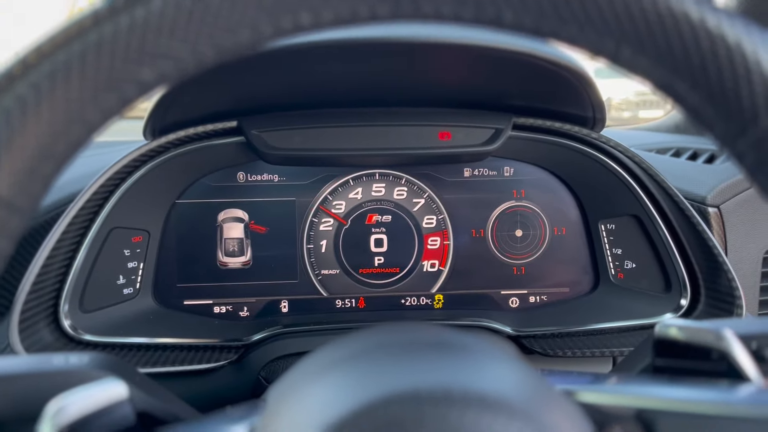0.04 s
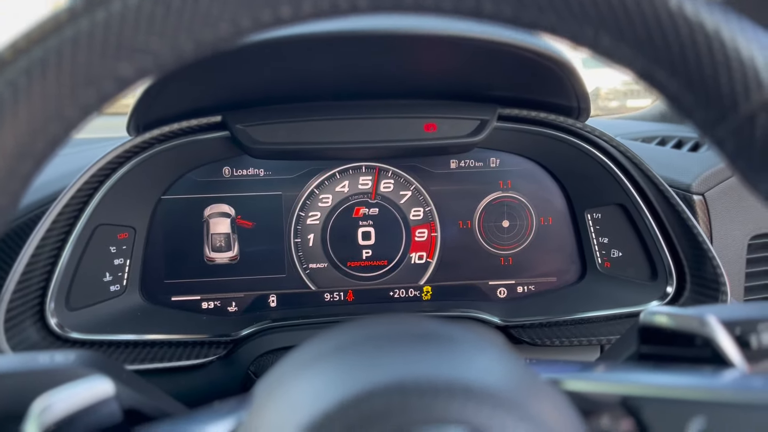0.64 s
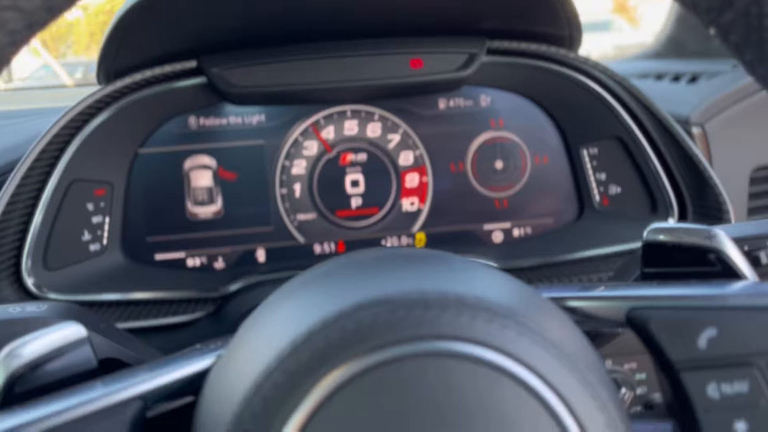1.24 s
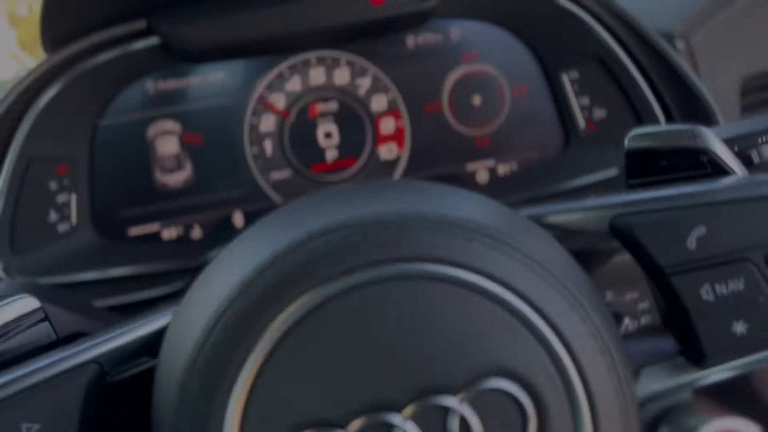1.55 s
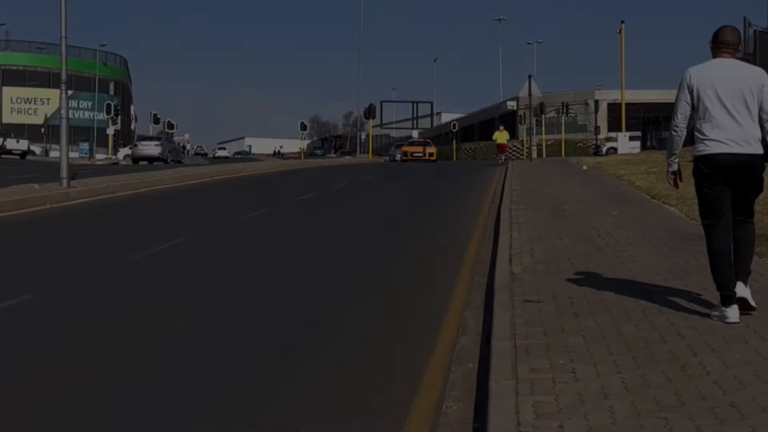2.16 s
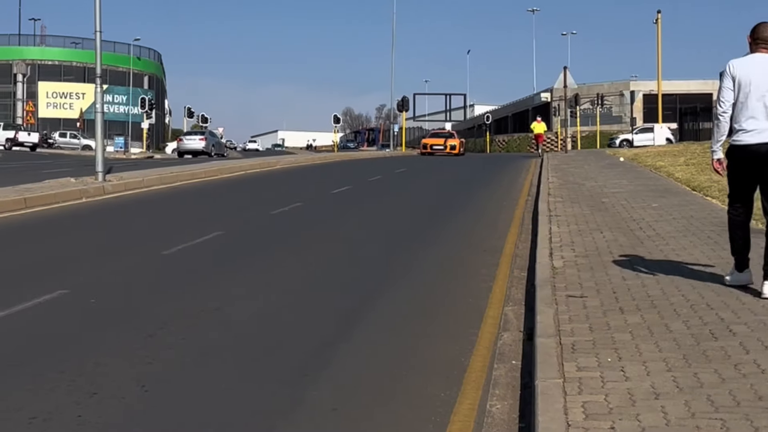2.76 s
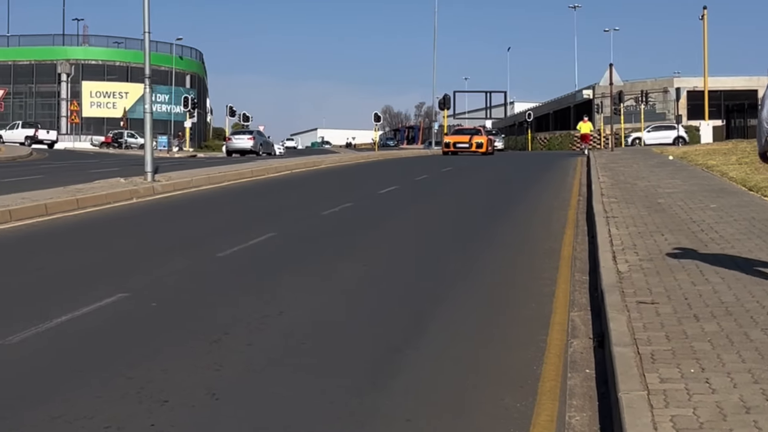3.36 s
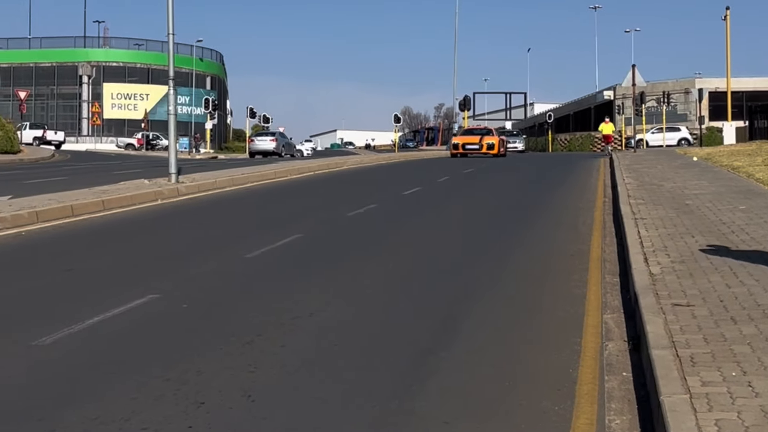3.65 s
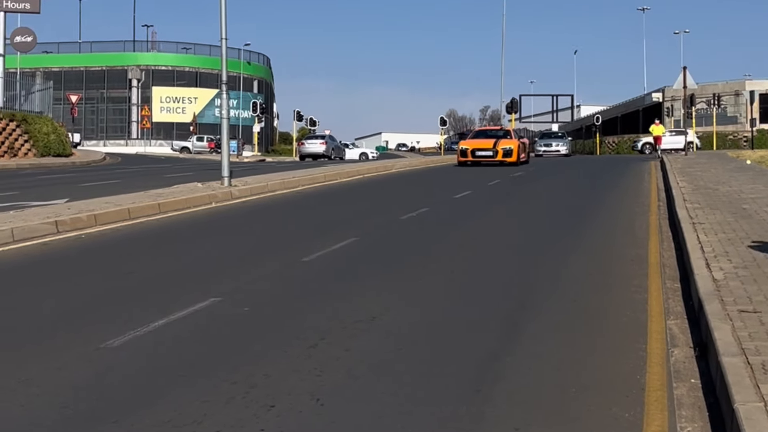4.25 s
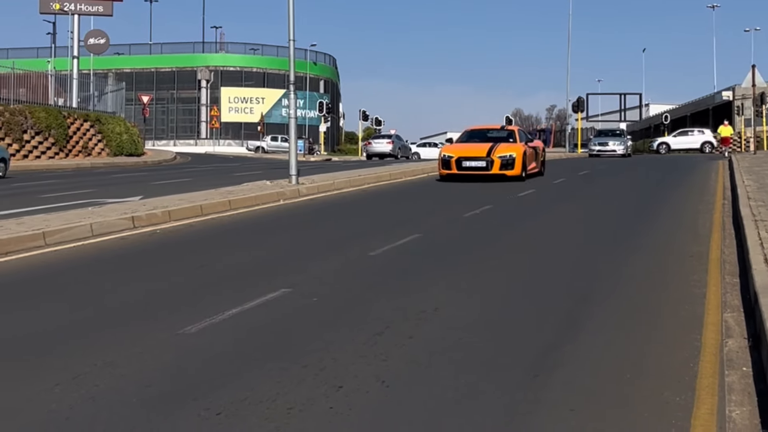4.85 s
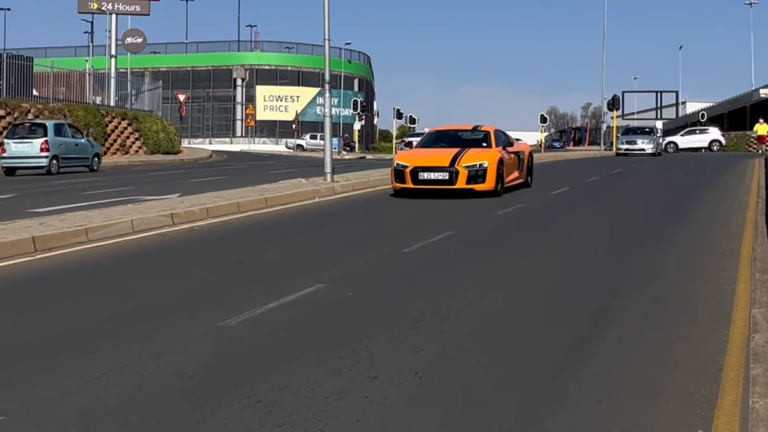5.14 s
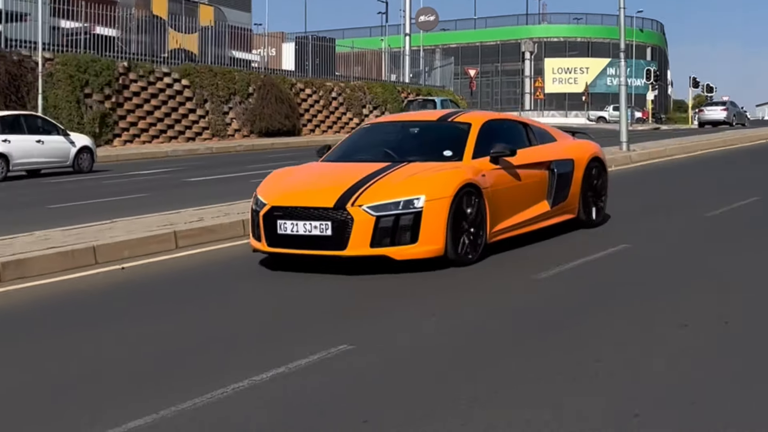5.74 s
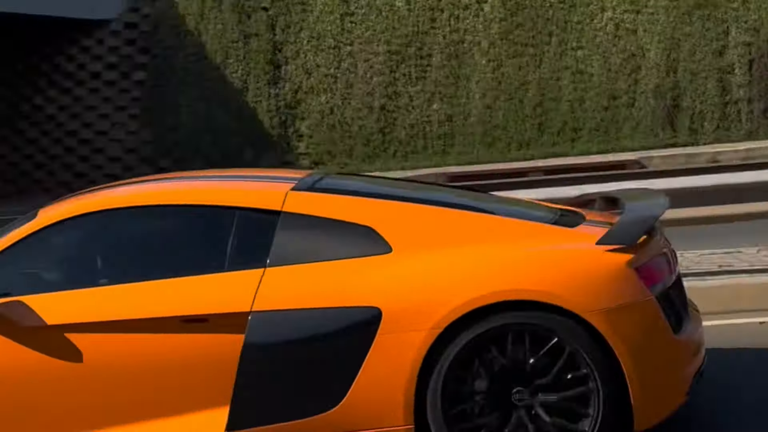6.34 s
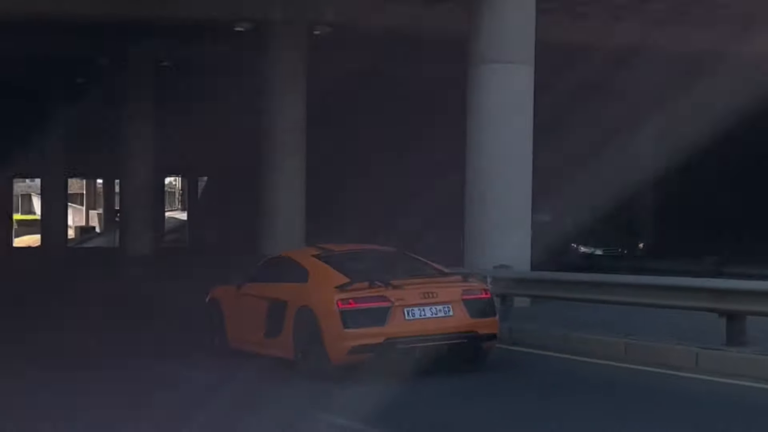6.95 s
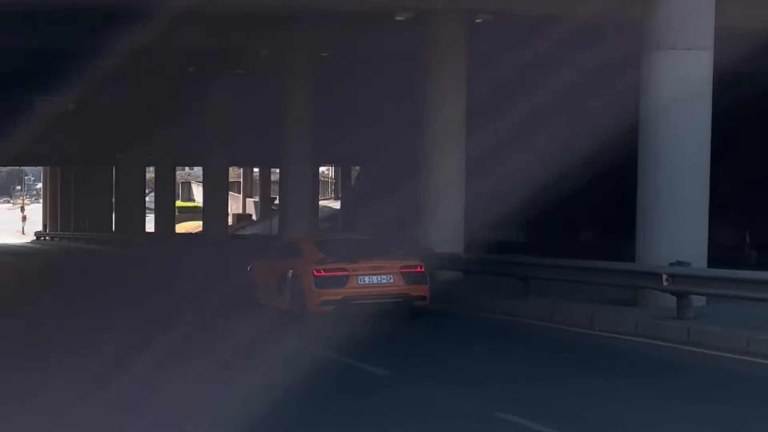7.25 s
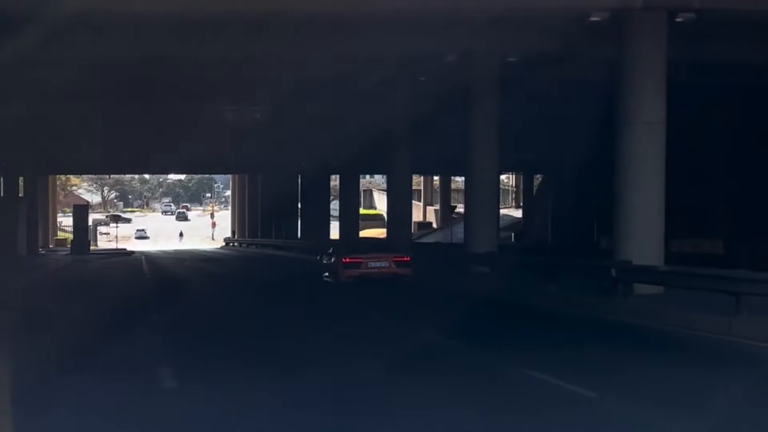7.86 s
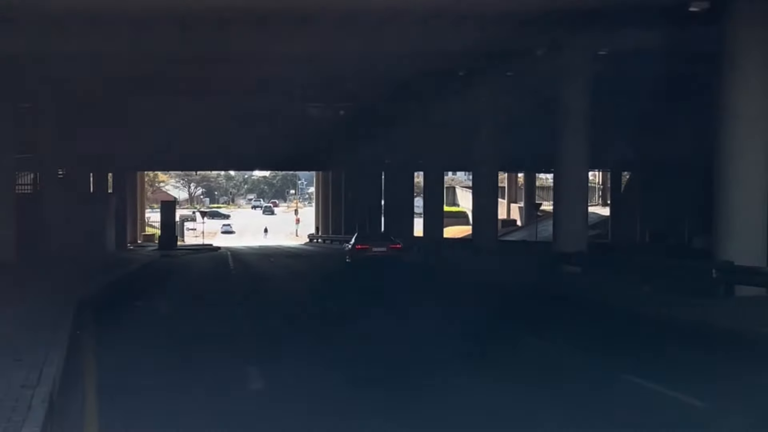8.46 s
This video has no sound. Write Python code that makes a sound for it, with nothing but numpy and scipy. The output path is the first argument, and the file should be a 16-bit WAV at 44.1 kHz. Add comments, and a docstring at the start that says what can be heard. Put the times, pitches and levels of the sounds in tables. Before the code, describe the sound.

One crackling throttle blip inside a sports car, then from the kerb it approaches, shifts up, pops and drives past.

```python
"""A V10 sports car, first from the driver's seat: one blip of the throttle, a crackle, a sink to idle.
Then from the kerb: it accelerates up the street, shifts up, pops as the driver lifts off, coasts
past the microphone and pulls away through a concrete underpass. The firing makes the note and howl,
unequal cylinders the lope, rushing gas the rasp and hiss, and unburnt fuel in the pipes the pops.
Behind it are throbbing traffic, a far brake and a bird."""
import sys
import numpy as np
from scipy import signal
from scipy.fft import rfft, irfft
from scipy.io import wavfile

SR = 44100
rng = np.random.default_rng(int(sys.argv[2]) if len(sys.argv) > 2 else 0)


def inscribe(sig):
    """Save sig as 16-bit PCM at rate SR to the path in sys.argv[1].

    A 1-D sig is mono; a 2-D sig holds one channel per row.
    Samples are clipped to [-1, 1] before scaling.
    """
    pcm = np.round(np.clip(np.atleast_2d(sig).T, -1, 1) * 32767)
    wavfile.write(sys.argv[1], SR, pcm.astype(np.int16))


N = 379260
TIME = np.arange(N) / SR
HZ = np.fft.rfftfreq(N, 1 / SR)

# Echoes of the street, the underpass and surfaces by the microphone. Each row: Hz, seconds to fall 60 dB.
STREET_RING = [(100, 1), (1000, 0.13), (4000, 0.16), (12000, 0.11)]
UNDERPASS_RING = [(100, 2.8), (500, 0.92), (2000, 0.12), (10000, 0.24)]
NEAR_RING = [(100, .2), (1000, .25), (10000, .15)]
# Stereo width in the seat and at the kerb. Each row: Hz, side level in dB.
CABIN_SIDE = [(60, -15.5), (110, -7.5), (200, -11.5), (370, 0.5), (670, 2.5), (1220, 5), (2230, -4.5),
              (4070, -1.5), (7440, 4), (13600, -11.5)]
STREET_SIDE = [(60, -37.5), (110, -21), (200, -16.5), (370, -8), (670, -4.5), (1220, -11), (2230, 2.5),
               (4070, 3.5), (7440, -2), (13600, -2.5)]
# Steady hiss from far down the street. Each row: Hz, relative dB.
FAR_HISS = [(1500, 2), (2700, 12), (4800, 11), (6500, -26.5), (9000, -12.5), (14000, -42.5)]
# Traffic drone. Each row: time in seconds, relative dB.
TRAFFIC_LEVEL = [(1.95, -18), (2.7, -17), (3.5, -23.5), (4.2, -26), (4.8, -20.5), (6, -31.5), (8.6, -67)]
# A far brake. Each row: start, end, attack and release in seconds.
BRAKE_SQUEAL = [(1.9, 2.72, .033, .11)]
# Three bird notes, a list for each. Each row: time in seconds, pitch in Hz, level in dB.
BIRD_NOTES = [
    [(2.535, 5050, -60), (2.55, 4950, -57), (2.565, 4350, -51.5), (2.58, 3600, -46.5), (2.597, 2950, -67)],
    [(2.622, 3250, -80.5), (2.642, 3380, -52.5), (2.662, 3430, -53.5), (2.685, 3400, -60)],
    [(4.888, 6070, -60.5), (4.905, 4550, -51), (4.925, 3770, -59)],
]

# Revs, parked and driving. Each row: time in seconds, firings per second of one five-cylinder bank.
PARKED_RATE = [(0, 85), (.15, 130), (.38, 243), (.45, 240), (.62, 207), (1.05, 153.5), (1.3, 120),
               (1.6, 85), (1.91, 67)]
DRIVING_RATE = [(1.95, 132), (2.35, 150.5), (2.8, 179.5), (3.3, 217), (3.5, 232), (3.8, 260), (3.92, 269),
                (4, 281), (4.52, 334.5), (4.72, 236), (5.05, 253), (5.6, 251.5), (6.2, 236), (6.55, 218),
                (6.87, 211.8), (7.09, 221.5), (7.17, 220.5), (7.3, 227), (7.76, 252), (8.27, 284),
                (8.4, 244), (8.6, 212)]
# How hard each cylinder of a bank blows, in dB.
CYLINDER_DB = [0, -4, -2, -5, -3]
# Lope of unequal cylinders. Each row: multiple of the engine cycle rate, dB under load, dB coasting.
LOPE_ORDERS = [(2, 2.5, -22), (3, 0, 1.5), (4, -1, -6), (6, -9, -5), (7, -6, -6), (8, -1, -9), (9, 0, -15),
               (11, -5, -23), (12, -5, -13), (13, -7, -18), (14, -4, -23), (17, -9, -30), (18, -8, -32),
               (19, -6, -34), (21, -5, -38), (22, -5, -34), (23, -6, -36), (24, -7, -38), (26, -6, -36),
               (27, -7, -36), (29, -8, -34)]
# What the engine is doing. Each row: start, end, attack and release in seconds.
BLIP = [(-0.073, 0.386, 0.14, 0.044)]  # throttle open, parked
BARK = [(.232, .39, .012, .03)]  # harsh top of the blip
BLIP_OVERRUN = [(.38, .505, 0.012, 0.072)]  # fuel cut after the lift
SPUTTER = [(.38, .9, 0.089, 0.29)]  # revs sinking
IDLE = [(1.35, 2, 0.29, 0.081)]
PULLS = [(1.8, 4.53, 0.2, 0.067), (4.7, 5.0, 0.036, 0.47), (6.88, 8.24, 0.12, 0.33)]  # throttle open, driving
STREET_OVERRUNS = [(4.52, 4.7, 0.076, 0.039), (5.36, 5.77, 0.21, 0.066), (8.26, 8.4, 0.076, 0.36)]
SPARK_CUT = [(4.535, 4.6, .008, .07)]  # for the upshift
# Unburnt fuel firing in the pipes. Each row: start in seconds, thump in dB, crack in dB,
# crack decay in seconds, fizz in dB.
CABIN_POPS = [(.366, -24, -37, .008, -41), (.384, -22, -34, .012, -38), (.446, -4.5, -55, .0073, -62),
              (.489, -18.5, -39, .017, -40), (.563, -17, -61, .0095, -68), (.745, -15.5, -55.5, .014, -64),
              (.9, -32, -57.5, .0064, -70), (1.012, -24, -59, .016, -68), (1.351, -42, -53, .005, -72),
              (1.648, -32, -64, .0043, -76), (1.708, -36, -62, .004, -80)]
STREET_POPS = [(4.522, -13, -32, .008, -50), (4.535, -11, -31, .0044, -52), (4.597, -29, -32, .002, -54),
               (4.651, -15, -38, .007, -54), (4.674, -10, -26, .017, -46), (4.695, -11, -30.5, .011, -52),
               (5.47, -9, -24, .0076, -39), (5.502, -3.5, -22, .009, -41), (5.533, -13, -33, .0015, -54),
               (5.562, -13, -38.5, .0029, -52), (5.59, -7, -16, .0038, -36.5),
               (5.621, -5, -18.5, .007, -40), (5.651, -5, -31, .004, -48), (5.668, -7, -36, .005, -50),
               (5.697, -10, -26, .011, -39), (5.711, -2.5, -23, .004, -52), (5.76, -4.5, -24, .012, -36),
               (5.774, -11, -32, .004, -52), (8.305, -14.5, -40, .01, -62)]
# Balance of the howl, inside and outside. Each row: firing harmonic, relative dB.
CABIN_HARMONICS = [(4, 8), (5, -4), (6, -2), (7, -6)]
STREET_HARMONICS = [(3, 0.5), (4, -7.5), (5, -2), (6, -3), (7, -4)]

# Tone of each layer from the driver's seat. Each row: Hz, relative dB.
CABIN_BOOM = [(70, -35), (88, -21.5), (104, -7), (125, -2.5), (180, 0.5), (205, -3.5), (240, -7),
              (275, -2.5), (325, -5.5), (400, -10.5), (490, -8.5), (700, -34.5)]  # the cabin's answer to note and lope
CABIN_HOWL = [(400, 1), (570, -1), (680, -0.5), (800, -10.5), (880, -16.5), (985, 2), (1100, -20.5),
              (1340, -3), (1600, -8.5), (2600, -34)]
CABIN_RASP = [(250, -32.5), (420, 23), (500, 16.5), (570, 17.5), (660, 4), (800, 13), (880, -4), (985, 9),
              (1120, 2.5), (1340, 4.5), (1750, -7.5), (2150, -3), (2350, -6), (2650, -4.5), (3500, -29),
              (6000, -32)]
CABIN_HISS = [(1500, -23), (2700, 0), (3700, -2), (4100, -4), (4430, -6), (4650, -4.5), (4900, -2),
              (5600, -12), (7000, -12.5), (9000, -39.5), (13500, -20)]
CABIN_BURBLE = [(20, -32), (33, 2), (55, -7.5), (90, -6), (150, 12), (230, 2), (285, -4.5), (335, 5.5),
                (385, -23.5), (480, -16), (530, -31), (575, -19), (680, -42), (2000, -67.5)]
# Tone of each layer from the kerb. Each row: Hz, relative dB.
TYRE_TONE = [(400, -19.5), (900, -11.5), (1400, 10.5), (1800, 5.5), (2200, -1), (2700, -32.5), (5000, -35)]
PIPE_RESONANCES = [(60, -12), (110, -5), (170, -1), (250, 0.5), (310, -4), (365, 8), (410, -1.5),
                   (460, -17.5), (520, -8.5), (570, -7), (700, -9), (1000, -7), (1500, -10)]  # the lope sweeps through these under load
GRIT_TONE = [(400, -10), (900, 0), (1300, 0), (1900, 0), (2300, -12), (2800, -14), (3600, -17), (5000, -20),
             (6000, -30), (7500, -26), (12000, -52)]
STREET_RASP = [(300, -11), (560, 9), (800, 3), (1200, 7), (1600, -1), (2000, -9.5), (2400, -9.5),
               (3300, -24), (6000, -54)]
STREET_HISS = [(1500, -10), (2700, 1), (4500, -0.5), (6000, -8), (7200, -4), (8500, -6), (10000, -20),
               (13000, -20), (14000, -36)]
STREET_BURBLE = [(15, -39.5), (28, -30), (42, -5), (70, -8.5), (130, -3), (220, -5), (300, -1), (360, 2.5),
                 (450, -9.5), (560, -6.5), (680, -12), (1000, -20), (2000, -73)]
# Each layer at the kerb as the car comes and goes. Each row: time in seconds, base level in dB.
TYRE_LEVEL = [(4.5, -51), (5.7, -37), (6.2, -46.5), (6.4, -36.5), (6.6, -39.5), (6.8, -47), (7.3, -60)]
TICKING_LEVEL = [(5.3, -75), (5.8, -53), (6, -56), (6.4, -56), (6.7, -62), (6.95, -68)]
NOTE_LEVEL = [(1.95, -24), (2.75, -18), (3.35, -13), (3.55, -21), (3.9, -12), (4.1, -15.5), (4.35, -12.5),
              (4.6, -9.5), (4.95, -11), (5.35, -7), (5.65, -7), (5.98, -6), (6.55, -9), (7.05, -11),
              (7.3, -19), (7.65, -14), (8.1, -26.5), (8.6, -26)]
SECOND_HARMONIC_LEVEL = [(1.95, -24.5), (2.3, -21.5), (2.8, -11.5), (3.05, -19), (3.5, -27), (3.75, -27),
                         (4.03, -16), (4.3, -26), (4.52, -24.5), (4.8, -28.5), (4.97, -22.5), (5.4, -25.5),
                         (5.9, -30), (6.8, -41.5), (7.02, -27.5), (7.6, -29), (8.2, -28), (8.6, -36)]
HOWL_LEVEL = [(1.95, -33.5), (2.25, -30.5), (2.55, -36), (3.15, -29), (3.45, -36.5), (3.92, -25),
              (4.1, -21.5), (4.45, -31), (4.65, -37), (5.05, -30.5), (5.5, -44.5), (6.86, -48.5),
              (7.03, -29.5), (7.15, -30.5), (7.3, -22), (7.6, -27.5), (8.25, -35.5), (8.42, -35.5),
              (8.6, -41)]
RASP_LEVEL = [(1.95, -49.5), (2.85, -46.5), (3.75, -34), (3.95, -35), (4.03, -28.5), (4.25, -28),
              (4.55, -33), (4.95, -32.5), (5.45, -35), (5.85, -35), (6.15, -42.5), (6.45, -42), (6.88, -49),
              (7.02, -36.5), (7.17, -43.5), (7.28, -34.5), (8.35, -33), (8.6, -37.5)]
GRIT_LEVEL = [(1.95, -66), (3.4, -54), (3.9, -46), (4.03, -37), (4.28, -34), (4.55, -40.5), (5.05, -46),
              (5.4, -55), (6.93, -64), (6.99, -46), (7.16, -47), (7.25, -42), (7.8, -37.5), (8.3, -40),
              (8.6, -54)]
HISS_LEVEL = [(1.95, -72), (2.8, -62), (3.6, -68), (3.9, -66), (4.05, -56), (4.25, -53), (4.55, -58),
              (5, -60), (5.4, -57), (5.8, -55), (6.4, -56), (6.92, -66), (7, -56), (7.17, -58),
              (7.3, -50.5), (7.9, -51), (8.33, -54.5), (8.6, -68)]
# Low end at the kerb. Each row: time in seconds, base levels of lope and gas burble in dB.
LOW_END_LEVELS = [(1.95, -25, -33), (2.7, -21.5, -31), (3.3, -23, -32), (4.15, -20, -32), (4.6, -24, -34),
                  (4.95, -23, -35), (5.35, -22, -29), (5.65, -27, -30), (5.87, -19, -39), (6.4, -21, -38),
                  (6.8, -25, -41), (7.05, -35.5, -46), (7.6, -33, -43), (8.3, -33, -44), (8.6, -38, -51)]
# A resonance lifts the howl, moving once in the underpass. Each row: seconds, centre in Hz, lift in dB.
HOWL_PEAK = [(6.7, 1210, 7.5), (7, 1205, 9), (7.3, 1300, 11), (7.6, 1310, 13), (7.8, 1160, 10.5),
             (8, 1150, 12), (8.26, 1180, 20), (8.45, 1020, 11)]
# Bands in which noise levels are set, in Hz.
LOW_BAND, MID_BAND, HIGH_BAND = (20, 2000), (900, 2200), (3000, 9000)


def amp(db):
    """Decibels to gain."""
    return 10 ** (np.asarray(db) / 20)


def unit(x):
    """Scales to rms 1."""
    return x / np.sqrt(np.mean(x ** 2) + 1e-20)


def curves(rows):
    """Each column of a table as a curve over the whole time."""
    s, *columns = np.transpose(rows)
    return [np.interp(TIME, s, c) for c in columns]


def gates(rows):
    """An envelope that rises, holds and falls once for each row."""
    return sum(np.clip((TIME - start) / attack, 0, 1) * np.clip(1 - (TIME - end) / release, 0, 1)
               for start, end, attack, release in rows)


def read(points, hz):
    """A spectrum joined by straight lines on a log-frequency axis."""
    f, value = np.transpose(points)
    return np.interp(np.log(hz + 1), np.log(f + 1), value)


def colour(x, spectrum, band):
    """Shapes a white sound of rms 1 so that it has rms 1 within the band."""
    gain = amp(read(spectrum, HZ))
    inside = (HZ >= band[0]) & (HZ <= band[1])
    return irfft(rfft(x) * gain / np.sqrt(np.mean(gain ** 2 * inside)), N)


def waver(hz, size=8192):
    """Slow random drift of rms 1, no faster than about hz."""
    slow = irfft(rfft(rng.standard_normal(size)) / (1 + (HZ[:size // 2 + 1] / hz) ** 4))
    return np.interp(TIME, np.linspace(0, N / SR, size), unit(slow))


def tone(hz, tremble_hz):
    """A near-pure tone of rms 1 with a trembling pitch."""
    return np.sqrt(2) * np.sin(2 * np.pi * np.cumsum(hz + tremble_hz * waver(53)) / SR)


def room(x, ring, size=65536):
    """Sparse reflections of random sign, each band dying at its own speed."""
    taps = rng.choice([-1., 1.], size) * (rng.random(size) < 2000 / SR) * (np.arange(size) > 100)
    hz, t, bands = signal.stft(taps, SR, nperseg=256)
    tail = signal.istft(bands * amp(-60 * t / read(ring, hz)[:, None]), SR, nperseg=256)[1]
    low_power = np.mean(abs(rfft(tail)[:size // 32]) ** 2)
    return signal.fftconvolve(x, tail / np.sqrt(low_power))[:N]


def microphones(x, width, lead_rad):
    """A stereo pair: one side leads in phase, and reflections differ between them, most in the treble."""
    diffuse = .4 * read([(100, .25), (1000, .6), (4000, .73)], HZ)
    direct = rfft(x) * np.exp(1j * lead_rad) * np.sqrt(1 - diffuse)
    reflected = np.sqrt(diffuse) * rfft(room(x, NEAR_RING))
    side = irfft((direct + reflected) * amp(read(width, HZ)), N)
    return np.array([x + side, x - side])


def traffic(hz=74, throb_hz=6.5):
    """Background traffic: a low drone and its octave, throbbing unevenly."""
    phase = 2 * np.pi * hz * TIME + .66 * waver(13)
    throb = 1 + .56 * np.cos(2 * np.pi * throb_hz * TIME + 2 * waver(2)) + .13 * waver(25)
    drone = (np.cos(phase) + .74 * np.cos(2 * phase + waver(25))) * throb
    return amp(curves(TRAFFIC_LEVEL)[0] - 7) * unit(drone)


def far_hiss():
    """The street's steady, distant hiss."""
    return amp(-61.5) * colour(rng.standard_normal(N), FAR_HISS, HIGH_BAND)


def brake():
    """A brake far off: one thin, unsteady squeal."""
    return amp(-62.5) * (1 + .42 * waver(16)) * gates(BRAKE_SQUEAL) * tone(hz=4560, tremble_hz=14)


def bird(note):
    """A bird whistles one faint, gliding note."""
    hz, db = curves(note)
    return amp(db) * (TIME > note[0][0]) * (TIME < note[-1][0]) * tone(hz, tremble_hz=45)


def tyres():
    """Tyre roar, swelling as the car passes the microphone."""
    return amp(curves(TYRE_LEVEL)[0]) * colour(rng.standard_normal(N), TYRE_TONE, MID_BAND)


def puffs(turns, depth):
    """Turbulence in one gust per turn; turns is the running count of firings."""
    return unit(rng.standard_normal(N) * np.exp(depth * np.cos(2 * np.pi * turns)))


def sizzle(turns):
    """The highest hiss carries only a few metres, so it is heard just as the car passes."""
    nearness = np.exp(-((TIME - 6.1) / .042) ** 2)
    highpass = signal.butter(2, 7000, "high", fs=SR, output="sos")
    return amp(-63.5) * nearness * unit(signal.sosfilt(highpass, puffs(turns, depth=.5)))


def ticking(turns):
    """Heard close up, the hardest cylinder spits one short burst in each engine cycle."""
    return amp(curves(TICKING_LEVEL)[0]) * colour(puffs(turns / 5, depth=1.3), STREET_HISS, HIGH_BAND)


def grit(turns, ring_s, scatter_db, size=2048):
    """Each cylinder's blow rattles the tailpipe in its own way, and does so again in every cycle."""
    firings = np.flatnonzero(np.diff(np.floor(turns)) > 0)
    cylinder = np.floor(turns[firings + 1]) % len(CYLINDER_DB)
    decay, sound = np.exp(-np.arange(size) / SR / ring_s), np.zeros(N)
    chance = amp(scatter_db * rng.standard_normal(N)[:len(firings)])
    for k, db in enumerate(CYLINDER_DB):
        blows = np.zeros(N)
        blows[firings] = amp(db) * chance * (cylinder == k)
        sound += signal.oaconvolve(blows, unit(rng.standard_normal(size) * decay))[:N]
    return unit(sound)


def blowdown(turns, rate, unequal, scatter):
    """A sharp pulse per firing; its strength differs by cylinder and by chance."""
    firings = np.flatnonzero(np.diff(np.floor(turns)) > 0)
    cylinder = np.floor(turns[firings + 1]) % 5
    strength = 1 + unequal * np.cos(np.pi * cylinder * 6 / 5)
    strength *= 1 + scatter * rng.standard_normal(len(firings))
    pulses = np.zeros(N)
    pulses[firings] = unit(strength) * np.sqrt(SR / rate[firings])
    return pulses


def pops(rows, pipe_hz, pipe_decay_s, crack_hz, fizz_decay_s, lowest_hz):
    """Each afterfire is a shock front, a ragged crack, a spit of gas and a thump that rings the pipe."""
    t, out = np.arange(SR // 8) / SR, np.zeros(N)
    crack_band = signal.butter(2, [crack_hz / 4, crack_hz], "band", fs=SR)
    fizz_band = signal.butter(3, 9500, fs=SR)
    front = .29 * np.sin(2 * np.pi * .63 * crack_hz * t) * np.exp(-t * crack_hz * 1.3)
    for start, thump_db, crack_db, crack_s, fizz_db in rows:
        pipe = sum(np.sin(2 * np.pi * k * pipe_hz * rng.uniform(.91, 1) * t) / k for k in (1, 2))
        gas = rng.standard_normal(len(t))
        flare = 1 - np.exp(-t / (.07 * crack_s))  # long cracks also build more slowly
        crack = 1.02 * flare * unit(signal.lfilter(*crack_band, gas)) * np.exp(-t / crack_s)
        thump = amp(thump_db) * pipe * flare * np.exp(-t / pipe_decay_s)
        fizz = amp(fizz_db) * flare * signal.lfilter(*fizz_band, gas) * np.exp(-t / fizz_decay_s)
        slot = out[round(start * SR):][:len(t)]
        slot += (thump + fizz + amp(crack_db) * (front + crack))[:len(slot)]
    return signal.sosfilt(signal.butter(3, lowest_hz, "high", fs=SR, output="sos"), out)


def lope(turns, load, jitter, order_db):
    """One cylinder in five blows harder, which sounds the orders between the firing harmonics."""
    cycle, slip = 2 * np.pi * turns / 5, jitter * waver(18)
    sound, power = np.zeros(N), np.zeros(N)
    for k, pulling_db, coasting_db in LOPE_ORDERS:
        gain = amp(load * pulling_db + (1 - load) * coasting_db)
        smear = np.pi * (max(k - 6, 0) / 4) ** 2  # the silencer spreads the blow in time
        drift = load * (2 * np.pi * rng.random() + .5 * waver(7))
        sound += gain * amp(order_db(k)) * np.cos(k * cycle - smear + slip * np.sqrt(k) + drift)
        power += gain ** 2 / 2
    return sound / np.sqrt(power)


def howl(turns, harmonic_db, flutter, jitter, lowest):
    """Upper firing harmonics: they shake together, and each fades and drifts on its own."""
    phase, sound = 2 * np.pi * turns + jitter * waver(39), np.zeros(N)
    for k in range(lowest, 8):
        gain = amp(harmonic_db(k) + 2 * waver(6)) * (1 + flutter * waver(30))
        sound += gain * np.cos(k * phase + 2 * np.pi * rng.random() + .5 * waver(9))
    return sound


def firing_note(turns, levels_db, flutter, jitter):
    """The lowest harmonics of the firing; higher ones waver more and leave the pipe shifted in phase."""
    phase, sound = 2 * np.pi * turns + jitter * waver(45), np.zeros(N)
    for k, db in enumerate(levels_db, 1):
        gain = amp(db) * (1 + flutter * np.sqrt(k) * waver(47))
        sound += gain * np.cos(k * phase + (k - 1) ** 2 * np.pi / 2)
    return sound


def far_echo(turns, first_db, second_db, firings_per_beat=24.9, cancel_s=3.181):
    """The note thrown back at a lower Doppler pitch, beating with the direct sound faster as revs rise."""
    beats = (turns - np.interp(cancel_s, TIME, turns)) / firings_per_beat
    depth = .68 * np.clip((4.6 - TIME) / .07 + 1, .15, 1)  # strongest while the car is far up the street
    return -depth * firing_note(turns - beats, [first_db, second_db - 5], flutter=.2, jitter=.2)


def exhaust(turns, rate):
    """The tailpipes from the kerb; firing is even when coasting and ragged on the overrun."""
    load, overrun, cut_db = gates(PULLS), gates(STREET_OVERRUNS), -8 * gates(SPARK_CUT)
    first_db = curves(NOTE_LEVEL)[0] - 3 * overrun + cut_db
    second_db = curves(SECOND_HARMONIC_LEVEL)[0] + cut_db
    howl_db = curves(HOWL_LEVEL)[0] + cut_db
    rasp_db, = curves(RASP_LEVEL)
    lope_db, burble_db = curves(LOW_END_LEVELS)
    peak_hz, peak_db = curves(HOWL_PEAK)
    db_per_octave = -16 - np.interp(TIME, [3, 4.8], [7, 0])  # distance dulls the howl
    bright_db = .67 * rasp_db - 5 - lope_db  # under load the lope's high orders follow the rasp

    def harmonic_db(k):
        lift_db = peak_db * np.exp(-((k * rate - peak_hz) / 220) ** 2)
        return howl_db + read(STREET_HARMONICS, k) + db_per_octave * np.log2(k / 3) + lift_db

    def order_db(k):
        return load * (read(PIPE_RESONANCES, k * rate / 5) + np.clip((k - 9) / 8, 0, 1) * bright_db)

    ragged, jitter = .03 + .04 * load + .35 * overrun, .09 + .35 * overrun
    sound = firing_note(turns, [first_db, second_db], flutter=ragged, jitter=ragged)
    sound += far_echo(turns, first_db, second_db)
    sound += howl(turns, harmonic_db, flutter=.33, jitter=jitter, lowest=3)
    sound += amp(lope_db) * lope(turns, load, jitter, order_db)
    pulsed = .07 + .16 * load
    gas = np.sqrt(pulsed) * blowdown(turns, rate, unequal=.6, scatter=.27)
    gas += np.sqrt(1 - pulsed) * puffs(turns, depth=.6)
    sound += amp(rasp_db - 2 * load) * colour(gas, STREET_RASP, MID_BAND)
    rattle = grit(turns, ring_s=.007, scatter_db=2.8)
    sound += amp(curves(GRIT_LEVEL)[0]) * colour(rattle, GRIT_TONE, band=(1500, 5000))
    sound += amp(curves(HISS_LEVEL)[0]) * colour(puffs(turns, depth=.23), STREET_HISS, HIGH_BAND)
    return sound + amp(burble_db + 12 * overrun) * colour(puffs(turns, depth=.3), STREET_BURBLE, LOW_BAND)


def driving_car():
    """The car passing in the open street, then ringing under the concrete deck."""
    rate, = curves(DRIVING_RATE)
    turns = np.cumsum(rate) / SR
    car = exhaust(turns, rate) + ticking(turns)
    car += pops(STREET_POPS, pipe_hz=318, pipe_decay_s=.0046, crack_hz=1740,
                fizz_decay_s=.014, lowest_hz=100)
    car += tyres() + sizzle(turns)
    far = np.interp(TIME, [4.5, 5.4], [1, .15])  # the direct sound takes over as it nears
    under = np.interp(TIME, [6.7, 7.3], [0, 1])
    return car + amp(-12) * room(car * far, STREET_RING) + amp(-12.5) * room(car * under, UNDERPASS_RING)


def parked_car():
    """The blip from the driver's seat, booming through the cabin as throttle and revs rise and fall."""
    rate, = curves(PARKED_RATE)
    load, overrun, sputter, idle = gates(BLIP), gates(BLIP_OVERRUN), gates(SPUTTER), gates(IDLE)
    turns = np.cumsum(rate) / SR
    revs = np.log2(rate / PARKED_RATE[2][1])  # octaves from the top of the blip
    note_db = -13.5 + (4 - 7 * revs) * load - 9 * overrun  # under load, heaviest at low revs
    db_per_octave = -19 + (18.7 + 7 * revs) * load
    boom_db = [note_db + read(CABIN_BOOM, k * rate) + db_per_octave * np.log2(k) for k in (1, 2, 3)]
    howl_db = -65.5 + 31.5 * load + 4 * revs
    lope_db = -39 + 9.1 * revs + 9.5 * sputter + 15 * idle + 5.7 * overrun
    rasp_db = -57.5 + 7.1 * revs + 16.6 * load + 6.6 * sputter + 9.6 * overrun
    hiss_db = -64.5 + (7 + load) * revs + 12 * load + 4.9 * gates(BARK) + 14.8 * overrun
    burble_db = -31.5 + 6.9 * revs + 7 * load + 10.5 * sputter + 12 * idle + 3.6 * overrun
    pulsed = .11 + .65 * load  # an open throttle sharpens the pulses
    gas = np.sqrt(pulsed) * grit(turns, ring_s=.003, scatter_db=2)
    gas += np.sqrt(1 - pulsed) * puffs(turns, depth=.1)
    car = firing_note(turns, boom_db, flutter=.08, jitter=.05)
    car += amp(howl_db) * howl(turns, lambda k: read(CABIN_HOWL, k * rate) + read(CABIN_HARMONICS, k),
                               flutter=.45, jitter=.1, lowest=4)
    car += amp(lope_db) * lope(turns, load, .33 * load, lambda k: load * read(CABIN_BOOM, k * rate / 5))
    car += amp(rasp_db) * colour(gas, CABIN_RASP, MID_BAND)
    car += amp(hiss_db) * colour(puffs(turns, depth=.068), CABIN_HISS, HIGH_BAND)
    car += amp(burble_db) * colour(puffs(turns, depth=.34), CABIN_BURBLE, LOW_BAND)
    return car + pops(CABIN_POPS, pipe_hz=156, pipe_decay_s=.0074, crack_hz=2220,
                      fizz_decay_s=.0096, lowest_hz=131)


def scene(cut_s=1.935):
    """Two microphone positions: the driver's seat gives way at once to the kerb."""
    seat = microphones(parked_car(), CABIN_SIDE, lead_rad=-1.56)
    street = traffic() + driving_car() + far_hiss() + brake() + sum(bird(note) for note in BIRD_NOTES)
    kerb = microphones(street, STREET_SIDE, lead_rad=1.83)
    outside = np.clip((TIME - cut_s) / .006, 0, 1)
    return seat * (1 - outside) + kerb * outside


def record(dry):
    """Peaks are rounded off softly, then the treble ends at 14.2 kHz."""
    rounded = dry / (1 + abs(dry / .97) ** 8) ** (1 / 8)
    lowpass = signal.firwin(511, 14200, window=("kaiser", 9), fs=SR)
    return signal.oaconvolve(rounded, lowpass[None], "same")


dry = scene()
out = record(dry)
inscribe(out)
```